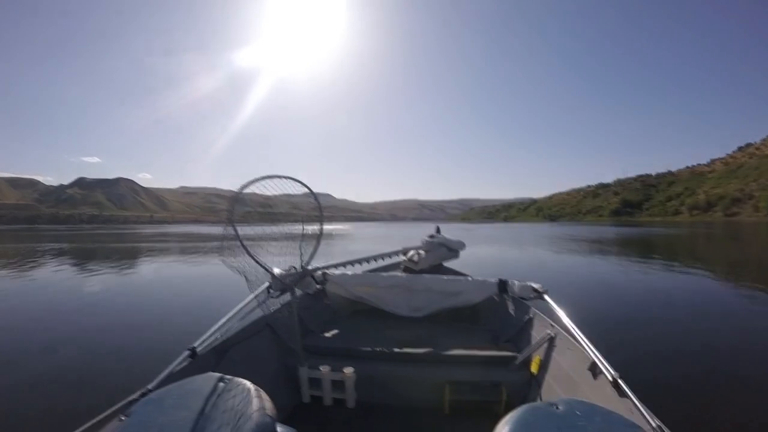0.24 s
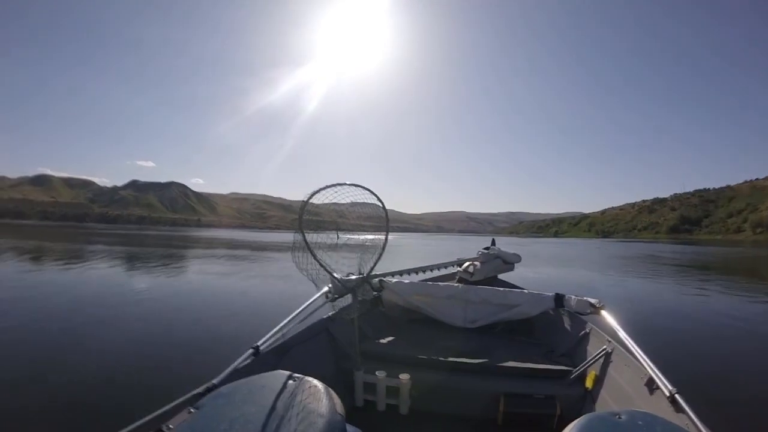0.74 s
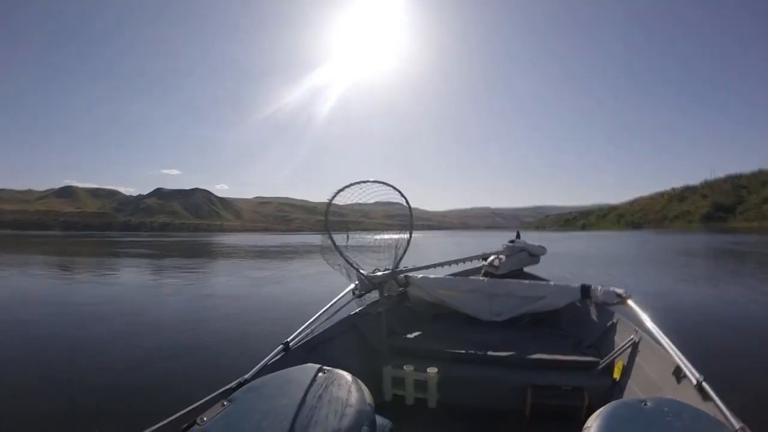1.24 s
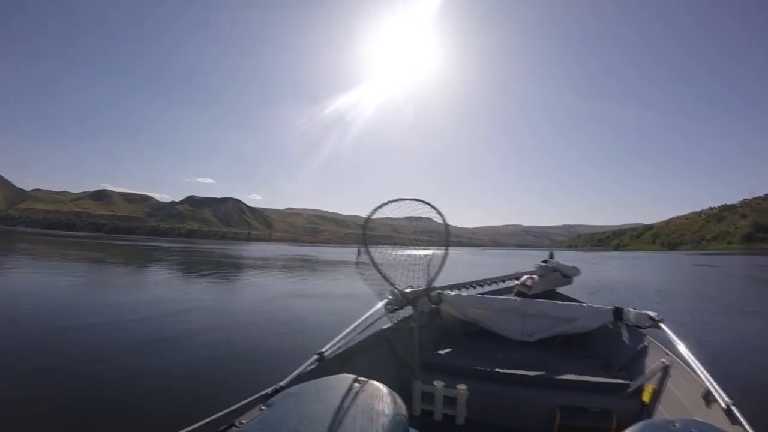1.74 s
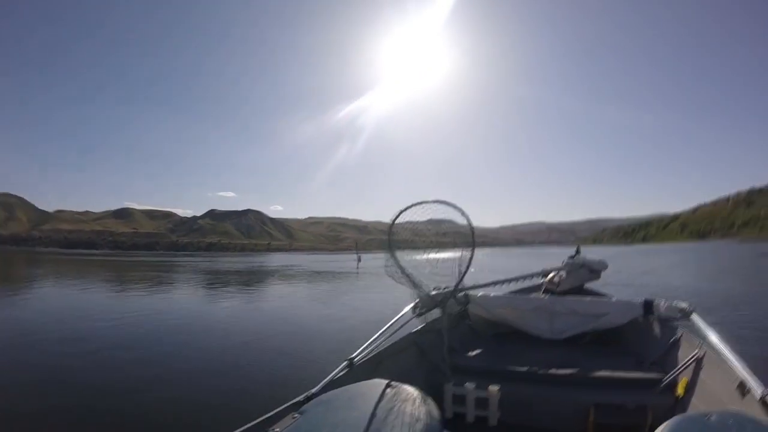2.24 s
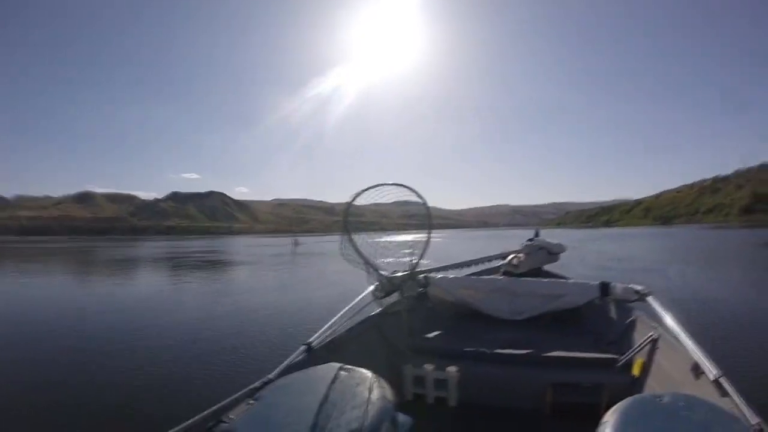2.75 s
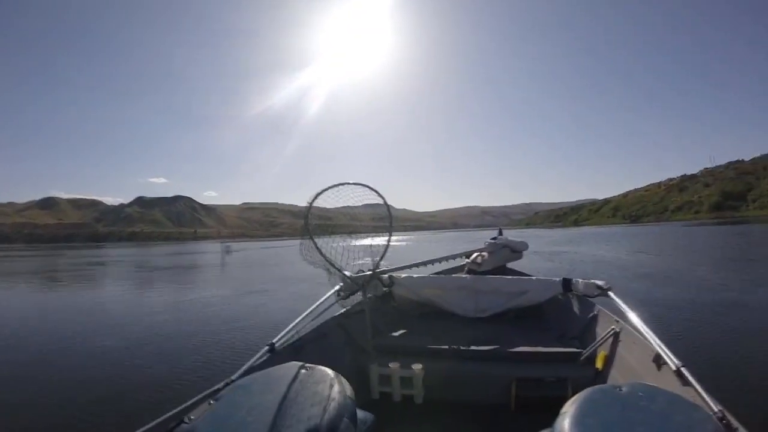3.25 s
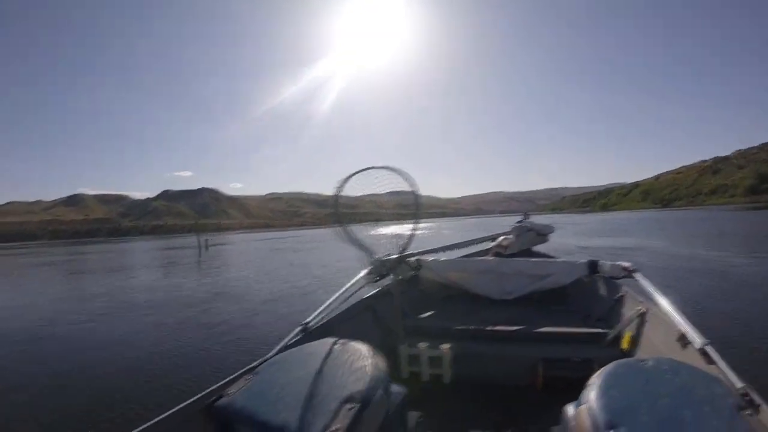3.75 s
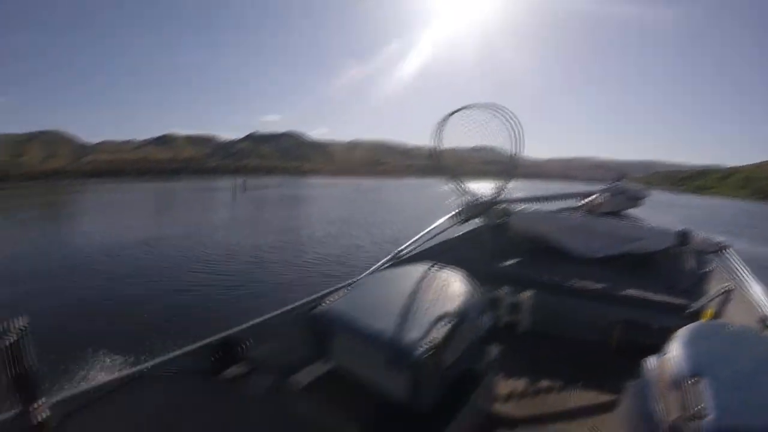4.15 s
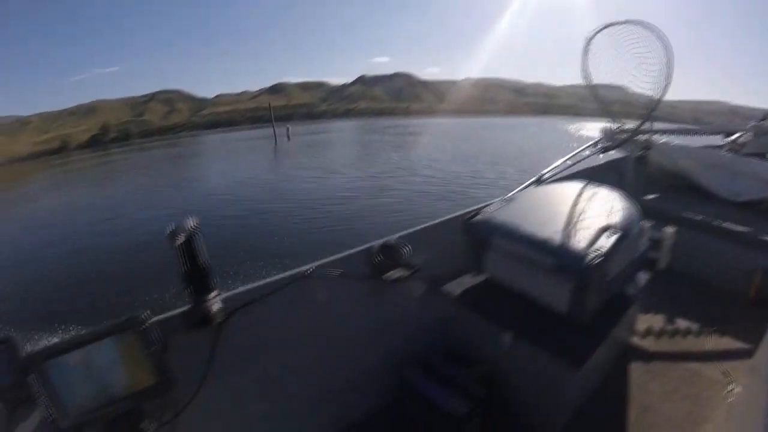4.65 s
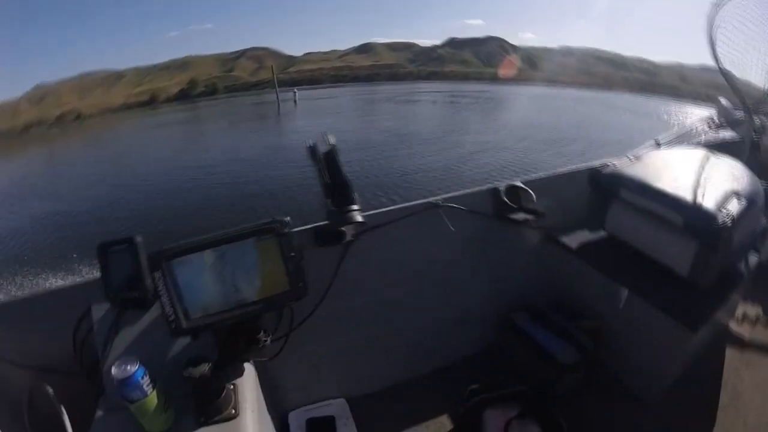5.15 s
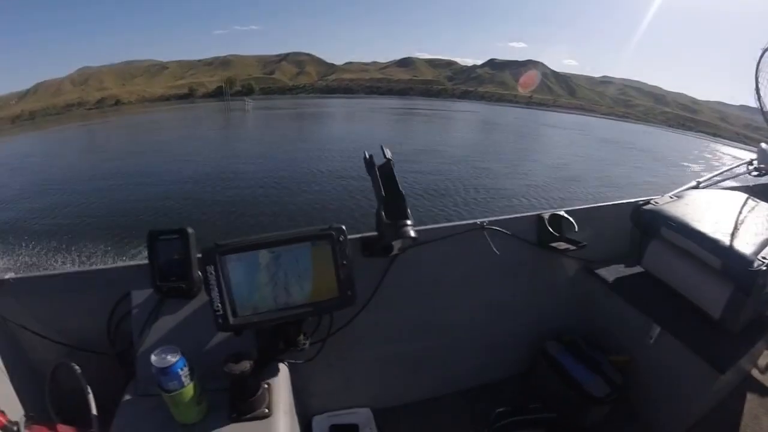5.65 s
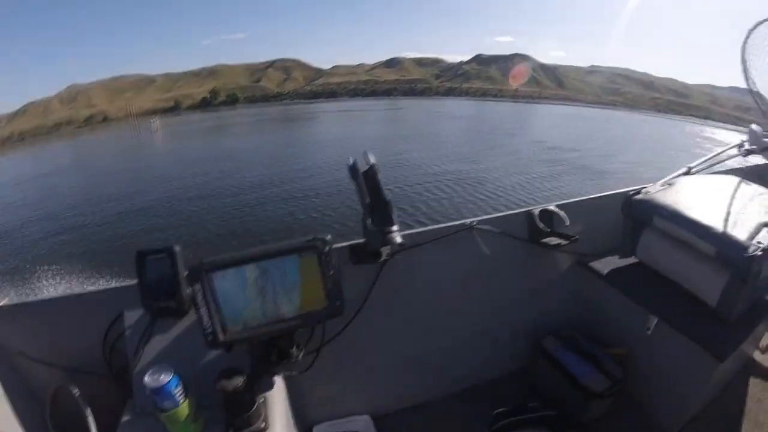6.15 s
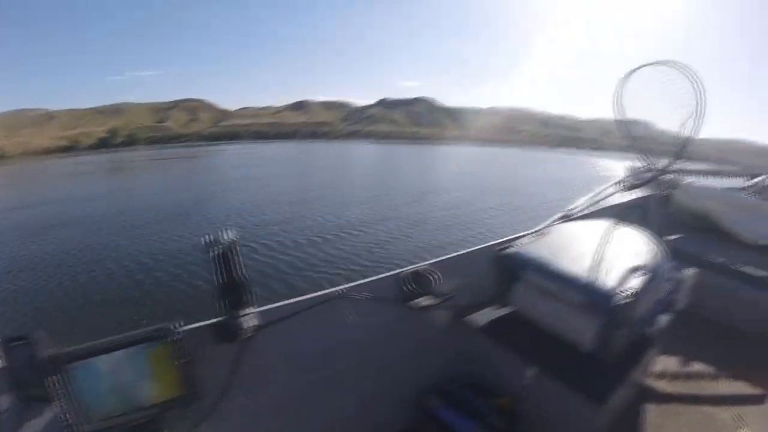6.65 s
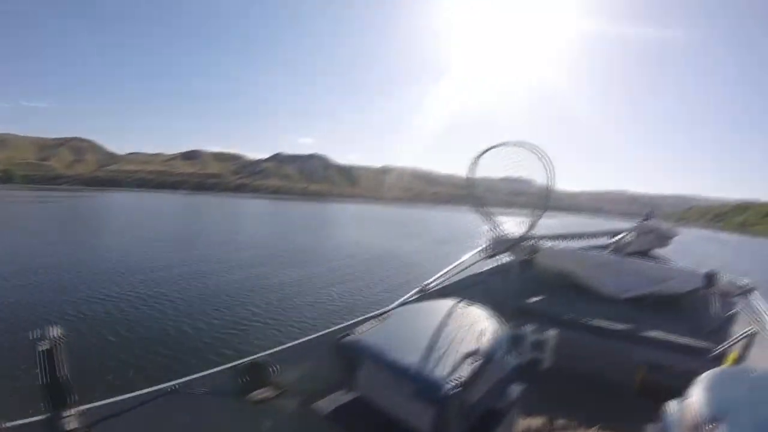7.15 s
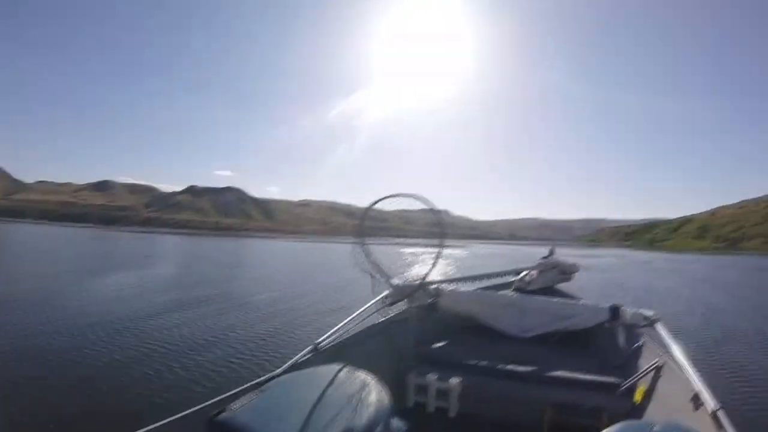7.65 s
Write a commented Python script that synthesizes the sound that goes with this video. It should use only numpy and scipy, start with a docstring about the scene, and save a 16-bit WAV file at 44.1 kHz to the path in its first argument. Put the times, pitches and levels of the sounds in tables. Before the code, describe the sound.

Steady low outboard drone with fine water hiss, interrupted by dull wind buffets, faint squeaks, and ragged gusts crowding the second half.

```python
"""A small open boat cruises over calm water: outboard motor steady at about 3000 rpm, spray hissing along the hull.
After two early gusts the wind rumbles on and buffets the microphone; the boat's level dips and creeps back.
Faint squeaks glide by at 2-2.6 s. Halfway the microphone turns sideways, tearing gusts take over, a side wash opens;
near the end it turns partly back. Motor: crank-locked sines and throbbing noise. Water: coloured noise.
Wind: noise swelling at random or shaped into buffets and gusts, pressure swings, ringing pops."""
import sys
import numpy as np
from scipy import signal
from scipy.fft import rfft, irfft, next_fast_len
from scipy.io import wavfile

SR = 44100
rng = np.random.default_rng(int(sys.argv[2]) if len(sys.argv) > 2 else 0)


def generate_wav(signal):
    """Clip the signal to [-1, 1] and save it as 16-bit WAV at the path in sys.argv[1]."""
    frames = np.transpose(np.atleast_2d(signal))
    scaled = np.clip(frames, -1, 1) * 32767
    pcm = np.round(scaled).astype(np.int16)
    wavfile.write(sys.argv[1], SR, pcm)


N = 347949
TIME = np.arange(N) / SR  # s

# spectrum of small-eddy flutter: (frequency [Hz], relative level [dB])
FLUTTER_SPECTRUM = [(50, 0), (110, 5), (200, 4), (350, -4.5), (600, -12.5), (1000, -21.5), (2000, -34),
                    (4000, -62)]
# spectrum of rushing air: (frequency [Hz], relative level [dB])
RUSH_SPECTRUM = [(100, -10.5), (300, 3.5), (600, 1.5), (1100, -2), (1800, -3.5), (2800, -5), (4500, -8.5),
                 (8000, -30)]


def from_db(db):
    """Decibels to amplitude gain."""
    return 10 ** (np.asarray(db) / 20)


def rms_one(x):
    """Scale to unit rms."""
    return x / np.sqrt(np.mean(x ** 2) + 1e-20)


def in_time(rows):
    """Interpolate each column of a time curve at every sample."""
    time_s, *columns = np.transpose(rows)
    return [np.interp(TIME, time_s, column) for column in columns]


def drift(rate_hz):
    """Slow random curve of unit rms: coarse noise through a double one-pole low-pass."""
    step = 40  # samples per coarse point
    settle = 2000  # coarse points dropped while the filter settles
    r = np.exp(-2 * np.pi * rate_hz * step / SR)
    coarse = rng.standard_normal(N // step + settle + 2)
    slow = signal.lfilter([1], [1, -2 * r, r * r], coarse)[settle:]
    return np.interp(np.arange(N) / step, np.arange(len(slow)), rms_one(slow))


def noise(spectrum):
    """Noise of unit rms with the given spectrum."""
    size = next_fast_len(N)
    hz, db = np.transpose(spectrum)
    bins_hz = np.maximum(np.arange(size // 2 + 1) * SR / size, 1)
    gain = from_db(np.interp(np.log(bins_hz), np.log(hz), db))
    # roll off past both ends of the table
    gain *= np.minimum(bins_hz / hz[0], 1) ** 2
    gain *= np.minimum(hz[-1] / bins_hz, 1) ** 2
    return rms_one(irfft(rfft(rng.standard_normal(size)) * gain, size)[:N])


def butter(x, hz, kind):
    """Second-order low- or high-pass."""
    sos = signal.butter(2, min(hz, SR / 2 - 1), kind, fs=SR, output="sos")
    return signal.sosfilt(sos, x)


def resonance(x, hz, width_hz):
    """One two-pole resonance, about unit gain at its peak."""
    r = np.exp(-np.pi * width_hz / SR)
    zeros = np.array([1, 0, -1]) * (1 - r * r) / 2
    poles = [1, -2 * r * np.cos(2 * np.pi * hz / SR), r * r]
    return signal.lfilter(zeros, poles, x)


def lumpy(x, depth_db, rate_hz):
    """Turbulence swells and starves a sound at random; output has unit rms."""
    return rms_one(x * from_db(depth_db * np.clip(drift(rate_hz), -2, 2)))


def airstream():
    """Large eddies rumble on the microphone, smaller ones flutter; both follow the airstream and swell at random."""
    # rumble: (time [s], level [dB])
    rumble_level = [(0, -36), (1.12, -36.5), (1.27, -30), (1.58, -25), (1.8, -45), (2.15, -36), (3.1, -37),
                    (3.7, -36), (3.88, -25), (4.05, -31), (4.5, -34), (4.68, -30), (5.3, -30), (5.6, -33),
                    (6.1, -38), (6.5, -25), (7.05, -31), (7.89, -25.5)]
    # flutter against the rumble: (time [s], relative level [dB])
    flutter_share = [(0, 0), (.7, -6), (1.25, -22), (1.8, -4.5), (2.2, -18), (4.4, -9.5), (4.8, -2.5),
                     (5.3, -5.5), (5.9, 4.5), (6.3, 4), (6.6, -1), (7.15, 4.5), (7.89, -6)]
    # rumble spectrum: (frequency [Hz], relative level [dB])
    rumble_spectrum = [(10, -14), (22, -0.5), (60, -0.5), (100, -3.5), (160, -13.5), (400, -38)]
    air_db, = in_time(rumble_level)
    share_db, = in_time(flutter_share)
    rumble = lumpy(noise(rumble_spectrum), depth_db=3.0, rate_hz=13)
    flutter = from_db(share_db) * lumpy(noise(FLUTTER_SPECTRUM), depth_db=4.0, rate_hz=57)
    return from_db(air_db) * (rumble + flutter)


def buffets(reach=3.4):
    """Each eddy swings the pressure up, then down; smaller swirls tumble and crackle inside it."""
    # eddies: (centre [s], half-width [s], thump peak [dB], tumble level before its swell [dB])
    eddies = [(1.651, 0.0021, -9, -15.5), (1.96, .003, -20.5, -45), (2.25, 0.0021, -12.5, -27.5),
              (2.59, .0031, -17, -31), (2.969, 0.0025, -13.5, -16.5), (3.42, 0.0054, -24, -15.5),
              (3.889, 0.0042, -17, -26.5), (3.936, 0.003, -22, -34), (4.16, 0.0049, -17.5, -31),
              (4.359, 0.0034, -10.5, -22.5), (4.611, 0.0023, -11.5, -36), (4.635, 0.0046, -18, -36),
              (4.666, 0.0057, -13.5, -20), (4.696, 0.004, -14, -28), (4.941, 0.0049, -19, -22),
              (4.971, 0.0047, -17.5, -33), (5.005, 0.0025, -11.5, -24), (5.076, 0.0097, -21, -23.5),
              (5.117, 0.005, -17.5, -25), (5.258, 0.0021, -12.5, -26), (5.3, 0.0024, -17, -20),
              (5.338, 0.0091, -21.5, -29), (6.005, 0.0035, -20, -20), (6.156, 0.0043, -25, -21.5),
              (6.279, 0.0036, -17, -20), (6.408, 0.0046, -22, -17.5), (6.851, .005, -15.5, -23),
              (7.194, 0.0012, -17, -27), (7.39, 0.0074, -26, -25.5), (7.65, 0.0065, -15, -24.5)]
    crackle_db = -22.5  # against the tumble
    out = np.zeros(N)
    flutter = noise(FLUTTER_SPECTRUM)
    rush = butter(butter(noise(RUSH_SPECTRUM), 350, "high"), 1400, "low")
    for centre_s, half_width_s, thump_db, tumble_db in eddies:
        near = np.abs(TIME - centre_s) < reach * half_width_s
        u = (TIME[near] - centre_s) / half_width_s
        swell = np.cos(np.pi / 2 * u / reach)
        thump = -u * np.exp((1 - u * u) / 2)  # peaks of 1 at u = -1 and +1
        crackle = from_db(crackle_db) * rms_one(rush[near])
        swirls = from_db(tumble_db) * (rms_one(flutter[near]) + crackle)
        out[near] += from_db(thump_db) * thump + swell * swirls
    return out


def gusts(rise_s=0.019, fall_s=0.0064):
    """Air separates at the port in spells that swell and break off: ragged rush, hiss above, flutter below."""
    # gusts: (start [s], end [s], mid-gust rush level [dB], rush corner [Hz], mid-gust hiss level [dB])
    spells = [(0.03, 0.164, -34, 1630, -67), (0.206, 0.253, -31, 1440, -52), (4.6, 4.614, -31, 1350, -52),
              (4.629, 4.665, -31.5, 1410, -51), (4.742, 4.803, -32, 1390, -60),
              (4.856, 4.913, -37, 1450, -63), (4.918, 4.941, -27, 760, -44.5),
              (4.991, 5.018, -30.5, 1400, -44.5), (5.026, 5.089, -38, 2200, -50.5),
              (5.139, 5.264, -36.5, 3160, -47.5), (5.271, 5.3, -31.5, 1550, -44),
              (5.334, 5.379, -38.5, 1470, -52.5), (5.419, 5.561, -38.5, 1570, -51),
              (5.561, 5.738, -33, 1410, -54), (5.769, 5.795, -36.5, 1150, -65),
              (5.824, 5.942, -31, 1110, -56.5), (5.966, 6.087, -32, 1220, -57.5),
              (6.168, 6.223, -29, 1030, -55.5), (6.337, 6.38, -26.5, 1180, -54),
              (6.394, 6.467, -35, 1100, -57), (6.518, 6.547, -33, 700, -64), (6.68, 6.715, -29.5, 810, -58),
              (6.74, 6.765, -35, 1200, -68), (6.917, 6.928, -25, 680, -66), (6.97, 6.993, -30, 680, -72),
              (7.142, 7.164, -33.5, 1100, -60)]
    # hiss spectrum: (frequency [Hz], relative level [dB])
    hiss_spectrum = [(2200, 3.5), (4000, -4), (5300, 4), (6600, -2.5), (8000, -13), (11000, -29.5),
                     (14000, -33)]
    swell_db = 1.5  # rise from start to end of a gust
    flutter_db = -6  # against the rush
    out = np.zeros(N)
    rush = noise(RUSH_SPECTRUM)
    hiss = lumpy(noise(hiss_spectrum), depth_db=3.0, rate_hz=54)
    flutter = from_db(flutter_db) * noise(FLUTTER_SPECTRUM)
    for start_s, end_s, rush_db, corner_hz, hiss_db in spells:
        near = (TIME > start_s - rise_s) & (TIME < end_s + fall_s)
        since_start_s = TIME[near] - start_s
        until_end_s = end_s - TIME[near]
        envelope = np.clip(np.minimum(since_start_s / rise_s, until_end_s / fall_s) + 0.5, 0, 1)
        swell = from_db(swell_db * (since_start_s / (end_s - start_s) - 0.5))
        air = rms_one(butter(rush[near], corner_hz, "low")) + flutter[near]
        out[near] += envelope * swell * (from_db(rush_db) * air + from_db(hiss_db) * hiss[near])
    return out * lumpy(np.ones(N), depth_db=2.57, rate_hz=180)


def pops(damping=0.66):
    """A tiny eddy snaps at the port: a swing or two of pressure, gone at once."""
    # pops: (time [s], peak [dB], pitch [Hz], low-pass edge [Hz])
    snaps = [(.531, -18.5, 738, 900), (1.655, -18.5, 354, 1500), (2.248, -20.5, 480, 1200),
             (2.960, -18, 556, 1400), (3.409, -20, 490, 900), (3.429, -23, 700, 1800),
             (4.342, -17.5, 620, 680), (4.607, -18.5, 506, 1500), (4.615, -30, 4800, 8000),
             (4.649, -21, 500, 1500), (4.932, -16.5, 690, 1600), (4.964, -21, 600, 1200),
             (4.965, -35, 7000, 9000), (5.000, -20, 600, 2500), (5.257, -20, 800, 3000),
             (5.297, -21, 700, 2500), (5.345, -21.5, 704, 1500), (5.399, -23.5, 600, 1000),
             (6.003, -20, 450, 1000), (6.389, -19, 610, 1700), (6.509, -24, 500, 900),
             (6.617, -7, 473, 1550), (6.700, -19, 594, 1300), (6.845, -18, 600, 1000),
             (6.912, -17, 550, 1000), (7.151, -19, 500, 900), (7.364, -22.5, 500, 700),
             (7.629, -21.5, 450, 700)]
    out = np.zeros(N)
    for time_s, peak_db, pitch_hz, edge_hz in snaps:
        ring = resonance(signal.unit_impulse(SR // 20), pitch_hz, damping * pitch_hz)
        snap = butter(ring, edge_hz, "low")
        at = round(time_s * SR)
        out[at:at + len(snap)] += from_db(peak_db) * snap / np.abs(snap).max()
    return out


def squeaks(flicker_hz=80):
    """Each squeak is an unsteady tone that swells, glides and fades."""
    # glides: (start [s], length [s], first pitch [Hz], last pitch [Hz], level at full swell [dB])
    glides = [(2.004, 0.18, 2380, 2870, -58.5), (2.14, 0.21, 2730, 2210, -58),
              (2.356, 0.076, 2140, 2300, -61), (2.549, .075, 2410, 2920, -55)]
    out = np.zeros(N)
    wavering = drift(flicker_hz) + 1j * drift(flicker_hz)  # random level and phase
    for start_s, length_s, first_hz, last_hz, db in glides:
        near = (TIME > start_s) & (TIME < start_s + length_s)
        u = (TIME[near] - start_s) / length_s
        phase = 2 * np.pi * np.cumsum(first_hz + (last_hz - first_hz) * u) / SR
        swell = np.sqrt(np.abs(np.sin(np.pi * u)))
        out[near] += from_db(db) * swell * (wavering[near] * np.exp(1j * phase)).real
    return out


def side_wash():
    """The wave running along the side: a softer, lower hiss of unit rms, noise through two equal resonances."""
    hz, width_hz = 5300, 1200
    once = resonance(rng.standard_normal(N), hz, width_hz)
    return rms_one(resonance(once, hz, width_hz))


def spray(spray_db, sizzle_db):
    """Fine droplets hiss along the hull, with a narrow sizzle on top."""
    # spray spectrum: (frequency [Hz], relative level [dB])
    spray_spectrum = [(2500, -18.5), (3900, -8), (5000, 2), (6000, 2), (6600, -2), (7100, -6), (8000, -7.5),
                      (10000, -17.5), (11300, -24), (12200, -40)]
    sizzle_hz = 6480
    hiss = lumpy(noise(spray_spectrum), depth_db=1.0, rate_hz=13)
    narrow = resonance(rng.standard_normal(N), sizzle_hz, width_hz=300)
    sizzle = lumpy(resonance(narrow, sizzle_hz, width_hz=3200), depth_db=1.5, rate_hz=38)
    return from_db(spray_db) * hiss + from_db(sizzle_db) * sizzle


def tones(orders, turns, waver_db, waver_hz, phase_spread_rad):
    """Lines locked to the crankshaft, each wavering a little in level and phase."""
    out = np.zeros(N)
    for order, db in orders:
        phase = 2 * np.pi * (order * turns + rng.random()) + phase_spread_rad * drift(waver_hz)
        level = from_db(db + waver_db * drift(waver_hz))
        out += np.sqrt(2) * level * np.sin(phase)
    return out


def motor(motor_db, whine_db):
    """Exhaust drone (two firings a turn), gear whine and a mechanical roar that throbs with the pistons."""
    # crankshaft: (time [s], speed [turns/s])
    crank_speed = [(0, 50.26), (0.5, 50.32), (1.0, 50.35), (1.5, 50.42), (1.9, 50.2), (2.3, 50.27),
                   (2.7, 50.48), (3.0, 50.44), (3.4, 50.53), (4.2, 50.73), (5.2, 50.69), (6.0, 50.7),
                   (6.5, 50.7), (6.9, 50.77), (7.4, 50.71), (7.89, 50.76)]
    # exhaust drone: (multiple of crank speed, relative level [dB])
    drone_orders = [(1, -13.5), (2, -2.5), (3, -28.5), (4, 0.5), (5, -14.5), (6, -3.5), (7, -14), (8, -21),
                    (9, -25.5), (10, -20), (11, -26), (12, -24.5), (13, -34.5), (14, -20), (15, -17.5),
                    (16, -26), (17, -28.5), (18, -17.5), (19, -45), (20, -32), (21, -35.5), (22, -43),
                    (23, -41.5), (24, -36.5)]
    # gear whine and side tones: (multiple of crank speed, relative level [dB])
    whine_orders = [(26, 5), (28, -13.5), (30, -27), (32, -18.5), (42, -16.5), (52, -17.5), (56, -19)]
    # roar spectrum: (frequency [Hz], relative level [dB])
    roar_spectrum = [(50, 8), (130, 1), (270, 0.5), (450, -8), (800, -14.5), (1100, -13.5), (1500, -13),
                     (2000, -20), (2700, -20.5), (3500, -25), (5000, -32.5), (9000, -71.5)]
    speed, = in_time(crank_speed)
    turns = np.cumsum(speed * (1 + 0.00046 * drift(20))) / SR
    drone = tones(drone_orders, turns, waver_db=0.5, waver_hz=6.2, phase_spread_rad=0.046)
    whine = tones(whine_orders, turns, waver_db=1.65, waver_hz=4.6, phase_spread_rad=0.078)
    # once and four times a turn
    throb = 1 + 0.059 * np.sin(2 * np.pi * turns) + 0.13 * np.sin(2 * np.pi * 4 * turns)
    roar = rms_one(noise(roar_spectrum) * throb)
    body = from_db(-2.0) * drone + from_db(-8.5) * roar
    return from_db(motor_db) * body + from_db(whine_db - 5.5) * whine


def boat():
    """The level under motor and water dips abruptly at set times and creeps back; turning away shades the
    treble most and opens the side wash."""
    # dips of the boat's level: (time [s], depth [dB])
    dips = [(0, 11.5), (1.608, 13), (2.927, 5.5), (3.378, 4.5), (4.3, 9), (4.6, 4), (5.0, 3.5), (5.3, 4.5),
            (5.7, 4.5), (6.15, 4), (6.6, 3.5), (7.0, 3), (7.4, 2.5)]
    # microphone turned from the bow: (time [s], share [0-1])
    turning = [(4.45, 0.09), (4.9, .65), (5.6, 0.98), (6.3, 1), (7.0, 0.6), (7.89, 0.55)]
    # gear whine: (time [s], relative level [dB])
    whine_level = [(0, -40), (1.5, -37.5), (3.4, -39), (4.1, -33.5), (4.55, -43.5), (6.5, -37.5),
                   (7.1, -42), (7.7, -36)]
    sink_s, recover_s = 0.01, 1.257
    # levels facing the bow, before dips
    motor_db, spray_db, sizzle_db = -22, -46.5, -48
    # losses at full turn
    turn_motor_db, turn_spray_db, turn_sizzle_db = 3, 10, 20
    wash_db = -46  # before the spray's turning loss
    sag_db = np.zeros(N)
    for time_s, depth_db in dips:
        sink = np.clip((TIME - time_s) / sink_s + 0.5, 0, 1)
        recovery = np.exp(-np.maximum(TIME - time_s, 0) / recover_s)
        sag_db += depth_db * sink * recovery
    turn, = in_time(turning)
    whine_db, = in_time(whine_level)
    water = spray(spray_db - turn_spray_db * turn, sizzle_db - turn_sizzle_db * turn)
    water += turn * from_db(wash_db - turn_spray_db * turn) * side_wash()
    return from_db(-sag_db) * (motor(motor_db - turn_motor_db * turn, whine_db) + water)


def scene():
    """Boat, wind and squeaks at one microphone on open water, without echoes."""
    wind = airstream() + buffets() + gusts() + pops()
    return (wind + squeaks() + boat())[None]


def record(dry):
    """Round off the highest peaks and cut the top of the spectrum."""
    ceiling, stop_hz = 0.48, 15000
    rounded = dry / (1 + (dry / ceiling) ** 6) ** (1 / 6)
    low_pass = signal.cheby2(12, 70, stop_hz, fs=SR, output="sos")  # 70 dB down from stop_hz
    return signal.sosfilt(low_pass, rounded)


dry = scene()
out = record(dry)
generate_wav(out)
```